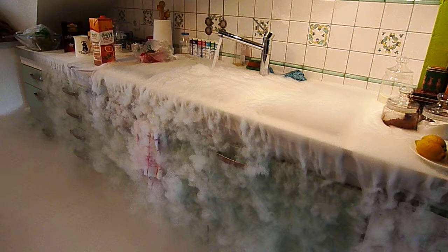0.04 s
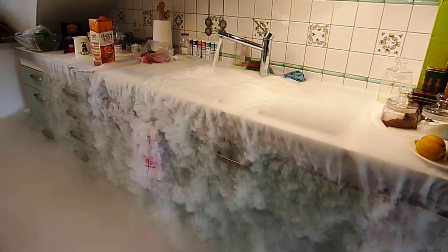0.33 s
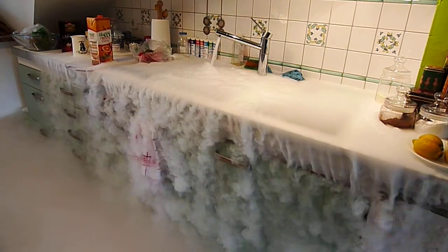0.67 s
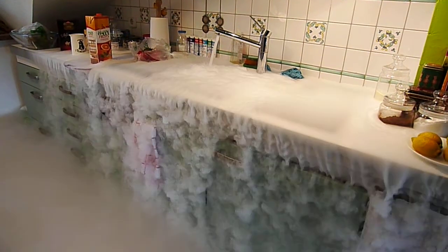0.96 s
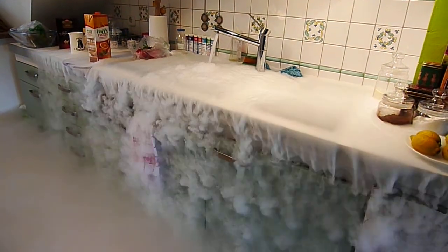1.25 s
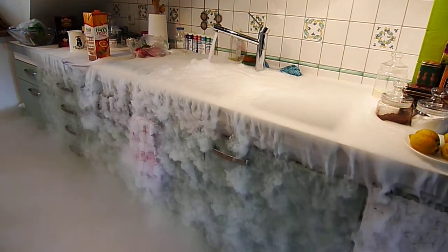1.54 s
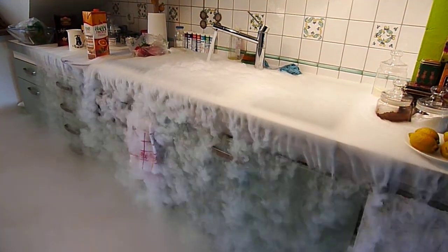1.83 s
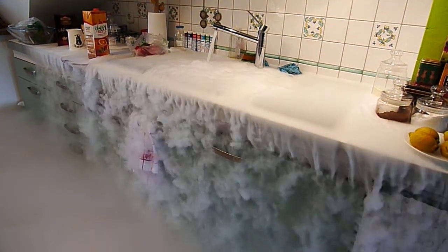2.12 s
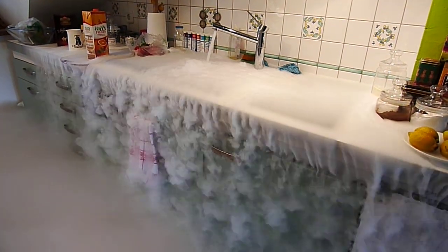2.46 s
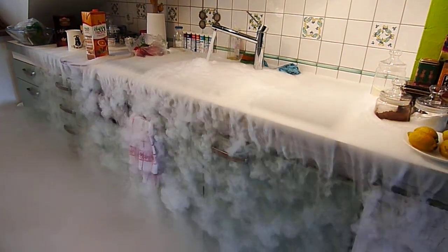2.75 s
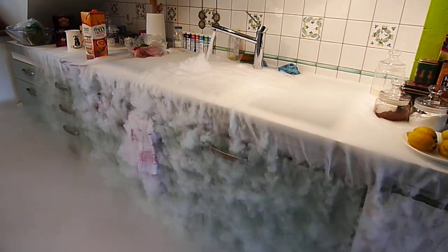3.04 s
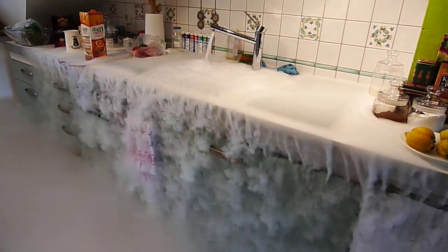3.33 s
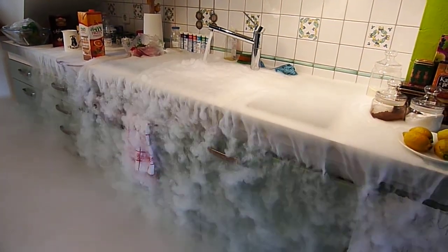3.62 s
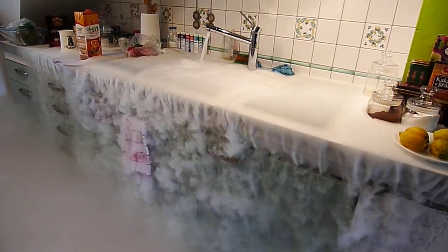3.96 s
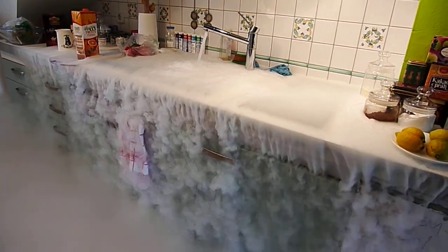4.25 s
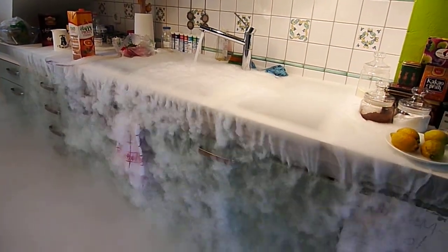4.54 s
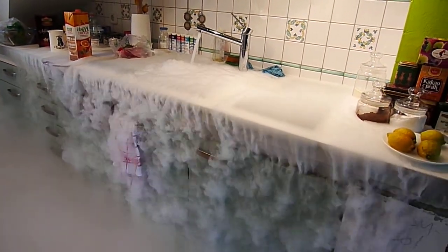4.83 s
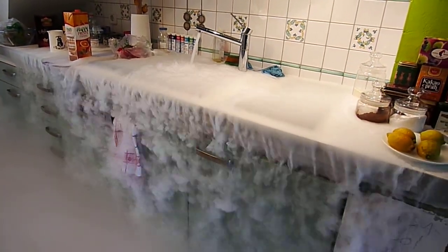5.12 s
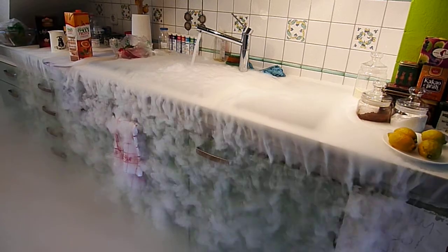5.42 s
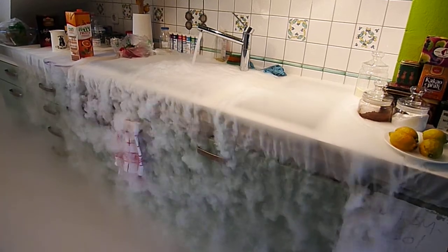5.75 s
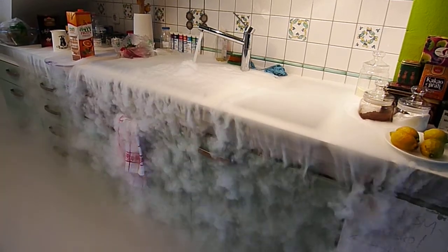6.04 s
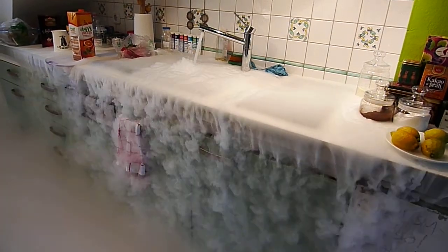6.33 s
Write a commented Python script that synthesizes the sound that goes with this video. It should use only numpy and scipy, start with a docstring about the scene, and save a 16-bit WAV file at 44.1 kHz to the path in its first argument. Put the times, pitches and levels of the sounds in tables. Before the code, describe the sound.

Tap water splashes into a kitchen sink where dry ice bubbles, gurgles and occasionally crackles under the water.

```python
"""A tap runs into a kitchen sink where dry ice boils under the water.
The jet splashes as drops and dense tiny bubbles and keeps one note of the basin singing.
Gas wells up in gurgles and big gulps; the ice cracks and spits. These ring in the basin
and a tiled room, over the rumble of heaving water, a faint hiss and one thin tick."""
import sys
import numpy as np
from scipy import signal
from scipy.fft import rfft, irfft, next_fast_len
from scipy.io import wavfile

SR = 44100
rng = np.random.default_rng(int(sys.argv[2]) if len(sys.argv) > 2 else 0)


def bounce(signal):
    """Save signal as a 16-bit WAV file at the path given by the first command-line argument."""
    frames = np.transpose(np.atleast_2d(signal))
    limited = np.clip(frames, -1, 1)
    pcm = np.round(limited * 32767).astype(np.int16)
    wavfile.write(sys.argv[1], SR, pcm)


N = 285768
START_S = .572
TIME_S = np.arange(N) / SR


def from_db(db):
    """Decibels to gain."""
    return 10 ** (np.asarray(db) / 20)


def unit_rms(x):
    """Scale to rms 1."""
    return x / np.sqrt(np.mean(x ** 2) + 1e-20)


def drift(corner_hz):
    """Smooth random wander, rms about 1."""
    hop, settle = 40, 2000
    pole = np.exp(-2 * np.pi * corner_hz * hop / SR)
    noise = rng.standard_normal(N // hop + settle + 2)
    slow = signal.lfilter([1], [1, -2 * pole, pole * pole], noise)[settle:]
    return np.interp(np.arange(N) / hop, np.arange(len(slow)), unit_rms(slow))


def colour(x, spectrum):
    """Filter by a gain curve over log frequency; rms 1."""
    hz, db = np.transpose(spectrum)
    n_fft = next_fast_len(N)
    bins_hz = np.maximum(np.fft.rfftfreq(n_fft, 1 / SR), 1)
    gain = from_db(np.interp(np.log(bins_hz), np.log(hz), db))
    return unit_rms(irfft(rfft(x, n_fft) * gain, n_fft)[:N])


def impulses(per_s, spread_db):
    """Clicks of random time, sign and size."""
    born = rng.random(N) < per_s / SR
    size = rng.standard_normal(N)
    return born * np.sign(size) * from_db(spread_db * np.minimum(np.abs(size), 2.5))


def bubble(hz, cycles, rise):
    """A sine dying 60 dB over `cycles`; pitch climbs by the fraction `rise` as it nears the surface."""
    age = np.arange(int(cycles / hz * SR) + 2) * hz / SR / cycles
    return np.sin(2 * np.pi * cycles * (age + rise * age ** 2 / 2)) * np.exp(-np.log(1000) * age)


def swarm(low_hz, high_hz, per_s, spread_db, cycles, rise, pitches=24):
    """Bubbles born at random, equal power per Hz across the band; rms 1."""
    out = np.zeros(N)
    for hz in np.geomspace(low_hz, high_hz, pitches):
        births = impulses(per_s / pitches, spread_db)
        rings = signal.oaconvolve(births, bubble(hz, cycles, rise))[:N]
        out += np.sqrt(hz) * unit_rms(rings)
    return unit_rms(out)


# Splash spectrum. Each row: frequency in Hz, relative gain in dB.
SPLASH_SPECTRUM = [(300, -19), (900, -13), (1500, -2.5), (1700, 2), (1900, -3), (2100, 1.5), (2750, 1),
                   (2960, -1), (3250, -2.5), (3450, -6), (3750, -9), (4200, -17), (4800, -26), (9000, -74)]

def splash(level_db):
    """The jet's drops slap the surface and drag in a fizz of tiny bubbles."""
    drops = from_db(4.5) * unit_rms(impulses(per_s=1300, spread_db=1.0))
    fizz = swarm(1147, 5070, per_s=3500, spread_db=0.5, cycles=10.3, rise=0.079)
    flutter_db = -0.04 * drift(20)
    return from_db(level_db + flutter_db) * colour(fizz + drops, SPLASH_SPECTRUM)


# Boil activity, large and small bubbles. Each row: time in seconds, drive in dB (scaled per layer).
VIGOUR = [(0.6, -2.5), (2.64, 1.5), (2.79, -2.5), (2.91, 4), (3.09, -3), (3.18, 4.5), (3.63, 0), (3.75, 4),
          (3.87, -1.5), (4.11, 2.5), (4.38, -3), (4.56, 4.5), (4.77, -1.5), (5.04, 2.5), (5.19, 0),
          (5.58, 2), (5.7, 0.5), (6.09, 1.5), (6.27, -1.5), (6.45, 1.5)]
SIMMER = [(0.6, -3), (2.19, -0.5), (2.4, 4), (2.55, -0.5), (3.12, 1.5), (3.21, 4), (3.99, -2), (4.08, 0.5),
          (5.64, 1.5), (5.91, -1.5), (6.0, 2.5), (6.45, -1.5)]
# Spectra of small, medium and large bubbles. Each row: frequency in Hz, relative gain in dB.
SMALL_SPECTRUM = [(400, -10), (750, 3), (850, 5), (950, -2), (1100, 2), (1400, -4.5), (1900, -10.5),
                  (7000, -53)]
GURGLE_SPECTRUM = [(150, -33), (330, -8.5), (400, -3), (460, 1.5), (560, -2), (660, -2.5), (760, -13),
                   (1000, -6.5), (2000, -35)]
CHURN_SPECTRUM = [(70, -21.5), (130, -12.5), (170, 1), (210, -1), (270, -2), (330, 1), (450, -15.5),
                  (1000, -31.5)]

def boil(vigour_db, simmer_db):
    """Gas leaves the ice in puffs, each freeing bubbles of three sizes."""
    puffs = drift(22)
    small = swarm(724, 1866, per_s=700, spread_db=3, cycles=11.2, rise=0.057)
    gurgle = swarm(323.6, 822, per_s=450, spread_db=2.5, cycles=15.2, rise=0.077)
    churn = swarm(125.5, 347, per_s=340, spread_db=1.0, cycles=6.4, rise=0.052)
    return (colour(small, SMALL_SPECTRUM) * from_db(-48 + 1.13 * simmer_db + 0.66 * puffs)
            + colour(gurgle, GURGLE_SPECTRUM) * from_db(-45.5 + 0.8 * vigour_db + 0.91 * puffs)
            + colour(churn, CHURN_SPECTRUM) * from_db(-49 + 0.67 * vigour_db + 0.52 * puffs))


# Basin resonances. Each row: frequency in Hz, width in Hz, lift in dB.
BASIN_MODES = [(196, 25, 3), (252, 32, 2), (526, 30, 3), (625, 30, 4), (665, 30, 3), (850, 30, 3),
               (1040, 27, 5), (1161, 26, 6), (1223, 18, 4), (1296, 26, 4), (1383, 24, 5), (1583, 20, 3),
               (1832, 45, 6), (2020, 36, 4), (2215, 30, 4), (2319, 36, 4), (2541, 40, 5), (2715, 30, 3),
               (3110, 60, 8.5), (3215, 70, 7.5), (3391, 20, 4), (3510, 30, 3), (3625, 30, 6), (3970, 60, 3)]

def basin(x):
    """Each resonance lifts its own narrow band and rings on."""
    out = x
    for hz, width_hz, lift_db in BASIN_MODES:
        band = signal.lfilter(*signal.iirpeak(hz, hz / width_hz, fs=SR), x)
        out = out + (from_db(lift_db) - 1) * band
    return out


# Swells of the basin's note. Each row: centre in seconds, lift in dB.
NOTE_SWELLS = [(1.13, 4), (1.33, 9.5), (1.84, 4.5), (2.96, 5.5), (4.89, 11)]

def basin_note(flow_db, hz, wander_hz, waver_db, swell_half_s):
    """The jet keeps one narrow basin mode ringing, unsteady in pitch and strength."""
    pitch_hz = hz + wander_hz * drift(49.2)
    note = np.sin(2 * np.pi * np.cumsum(pitch_hz) / SR) * from_db(waver_db * drift(70))
    swell_db = sum(db * np.exp(-((TIME_S - s) / swell_half_s) ** 2) for s, db in NOTE_SWELLS)
    return from_db(-51.5 + 0.2 * flow_db + swell_db) * unit_rms(note)


def kitchen(x, t60_s, wet_db):
    """Dense reflections from the tiles follow the direct sound."""
    t = np.arange(SR // 2) / SR
    tail = rng.standard_normal(len(t)) * from_db(-60 * t / t60_s) * (t > .004)
    wet = signal.oaconvolve(x, tail / np.linalg.norm(tail))[:N]
    return (x + from_db(wet_db) * wet) / np.hypot(1, from_db(wet_db))


# Rumble spectrum. Each row: frequency in Hz, relative gain in dB.
RUMBLE_SPECTRUM = [(15, -26), (35, -15), (50, -4), (75, -0.5), (100, 8), (130, -2.5), (300, -75.5)]

def rumble(vigour_db, growth_db_per_s):
    """The water mass heaves with the boil, slowly growing louder."""
    level_db = -59.8 + 0.6 * vigour_db + growth_db_per_s * (TIME_S - TIME_S.mean())
    return from_db(level_db) * colour(rng.standard_normal(N), RUMBLE_SPECTRUM)


# Hiss spectrum. Each row: frequency in Hz, relative gain in dB.
HISS_SPECTRUM = [(1000, 14.5), (6000, -5.5), (7500, -6.5), (8100, -12.5), (8800, -31.5), (9400, -49.5)]

def hiss(level_db):
    """Steady dull noise."""
    return from_db(level_db) * colour(rng.standard_normal(N), HISS_SPECTRUM)


# Big gas bubbles. Each row: start in seconds, peak in dB before the basin, pitch in Hz, ring in cycles.
GULPS = [(0.927, -33, 660, 12), (0.929, -28, 468, 22), (0.94, -34, 200, 15), (0.953, -30, 505, 14),
         (1.215, -33, 673, 34), (1.734, -31, 630, 12), (1.735, -32.5, 1060, 15), (1.789, -32, 553, 9),
         (2.28, -33, 230, 8), (2.354, -30.5, 1120, 22), (2.449, -32, 1055, 20), (2.654, -31.5, 590, 12),
         (2.67, -34, 1074, 20), (2.872, -32, 250, 7.9), (2.964, -29.5, 450, 11), (2.988, -32, 590, 10),
         (3.093, -33.5, 627, 35), (3.236, -32, 1150, 26), (3.71, -29.5, 462, 30), (3.73, -27.5, 502, 14),
         (3.754, -25, 635, 38), (3.756, -29.5, 1120, 26), (4.05, -33, 640, 14), (4.135, -33, 640, 22),
         (4.501, -32, 239, 7.6), (4.538, -30.5, 198, 6.5), (5.585, -31, 1250, 22), (5.595, -23, 600, 5.3),
         (5.609, -31, 1200, 17), (5.696, -32, 1150, 24), (6.066, -30.5, 664, 18), (6.134, -35, 113, 3.6),
         (6.167, -30.5, 645, 16), (6.176, -29.5, 934, 29), (6.335, -30, 610, 5.8), (6.39, -33, 636, 36)]

def gulps(rise):
    """Single large bubbles swell over their first cycle and ring out above the boil."""
    out = np.zeros(N + SR)
    for start_s, peak_db, hz, cycles in GULPS:
        ring = bubble(hz, cycles, rise)
        age_cycles = np.arange(len(ring)) * hz / SR
        ring *= 1 - np.exp(-(2 * age_cycles) ** 2)
        at = round(start_s * SR)
        out[at:at + len(ring)] += from_db(peak_db) * ring / np.abs(ring).max()
    return out[:N]


# Ice cracks. Each row: start in seconds, level in dB before filtering, 60 dB decay in seconds.
ICE_CRACKS = [(1.17, -32, .2), (1.29, -33, .2), (1.92, -28.5, 0.2), (5.596, -23.5, .06), (5.615, -24, 0.14),
              (5.97, -9, 0.01), (5.976, -18.5, .03), (5.986, -24, 0.14)]

def ice_cracks(band_hz):
    """The ice spits short, bright bursts of noise."""
    envelope = sum(from_db(db - 60 * np.abs(TIME_S - start_s) / t60_s) * (TIME_S >= start_s)
                   for start_s, db, t60_s in ICE_CRACKS)
    bursts = envelope * rng.choice([-1, 1], N)
    bandpass = signal.butter(2, band_hz, "band", fs=SR, output="sos")
    return signal.sosfilt(bandpass, signal.sosfilt(bandpass, bursts))


def tick(start_s, peak_db, t60_s):
    """A tiny click reaching far into the treble."""
    age_s = TIME_S - start_s
    return from_db(peak_db - 60 * np.abs(age_s) / t60_s) * (age_s >= 0)


def scene():
    """Tap, boil and ice in basin and room, plus rumble, hiss and tick; mono."""
    build_db, build_s = 5, 0.83
    flow_db = -build_db * np.exp(-np.maximum(TIME_S - START_S, 0) / build_s)
    vigour_db = np.interp(TIME_S, *np.transpose(VIGOUR))
    simmer_db = np.interp(TIME_S, *np.transpose(SIMMER))
    water = splash(level_db=-41 + flow_db) + boil(vigour_db, simmer_db) + gulps(rise=0.034)
    note = basin_note(flow_db, hz=1830, wander_hz=20, waver_db=2.5, swell_half_s=0.043)
    sink = basin(water + ice_cracks(band_hz=(1860, 3330))) + note
    mix = hiss(level_db=-53.5) + kitchen(sink, t60_s=0.22, wet_db=-8.5)
    mix += rumble(vigour_db, growth_db_per_s=0.7)
    mix += tick(start_s=5.075, peak_db=-30, t60_s=.001)
    return mix[None]


def record(dry):
    """Abrupt start and stop; the top is cut."""
    fade_s, cutoff_hz = .002, 16000
    gate = np.clip(np.minimum(TIME_S - START_S, TIME_S[-1] - TIME_S) / fade_s, 0, 1)
    lowpass = signal.ellip(10, .1, 80, cutoff_hz, fs=SR, output="sos")
    return signal.sosfilt(lowpass, dry * gate)


dry = scene()
out = record(dry)
bounce(out)
```